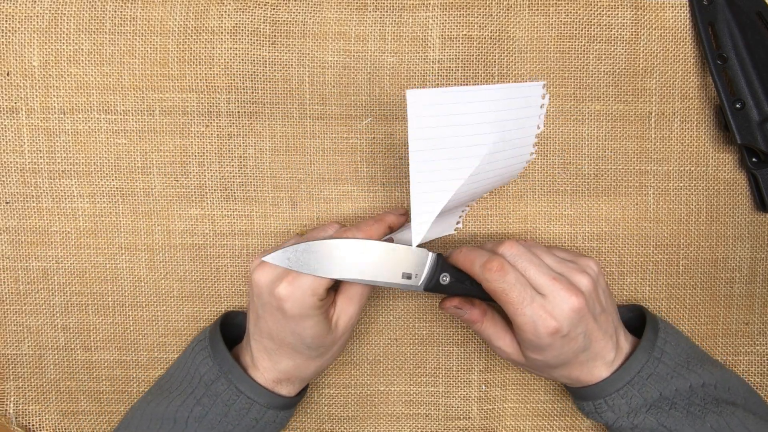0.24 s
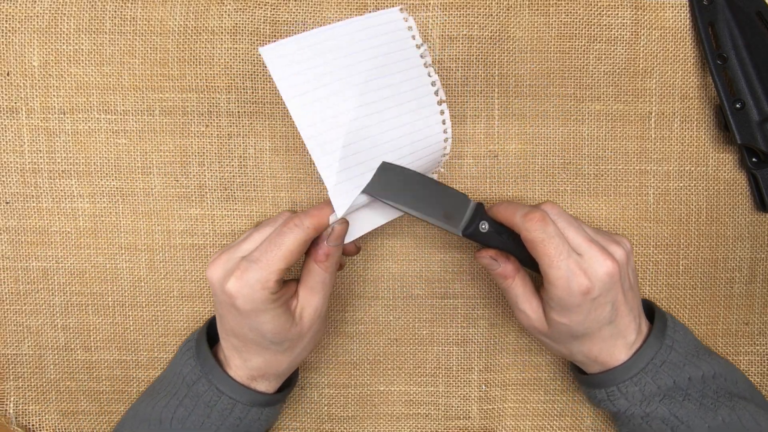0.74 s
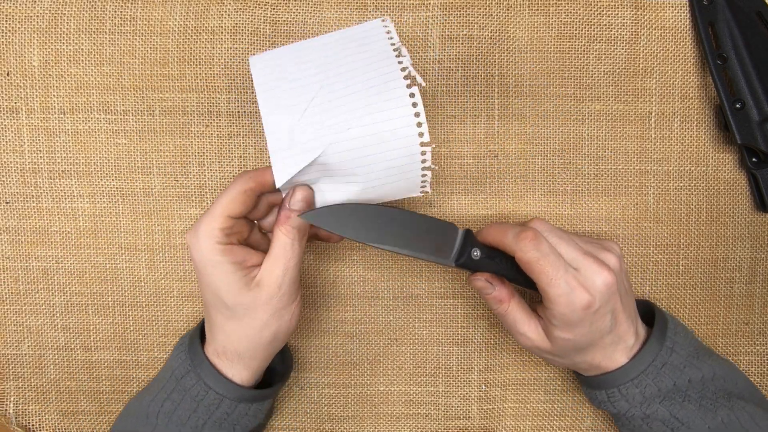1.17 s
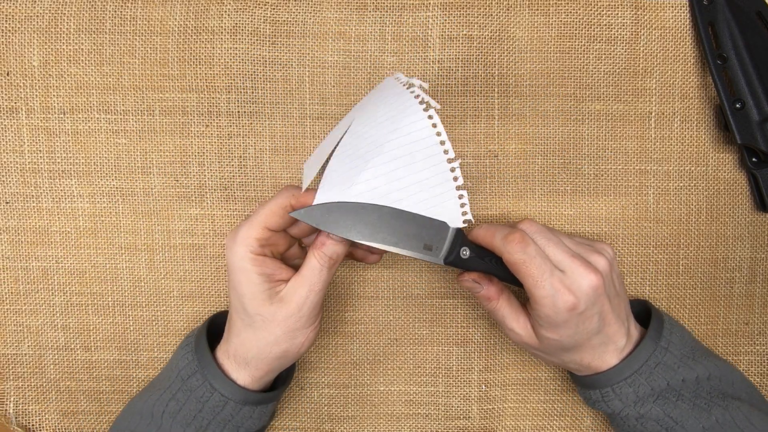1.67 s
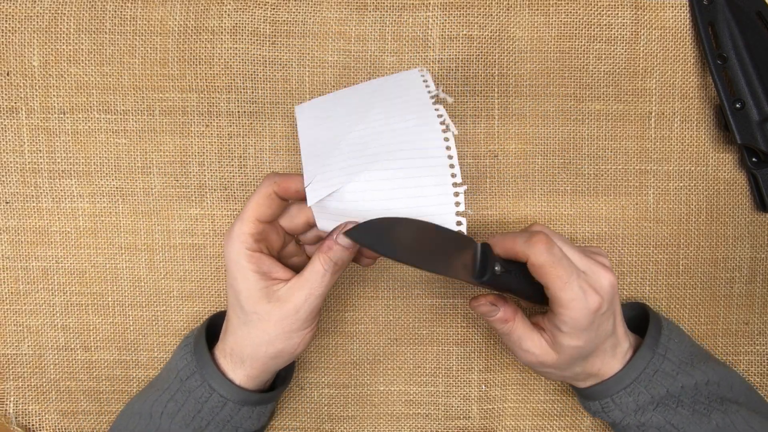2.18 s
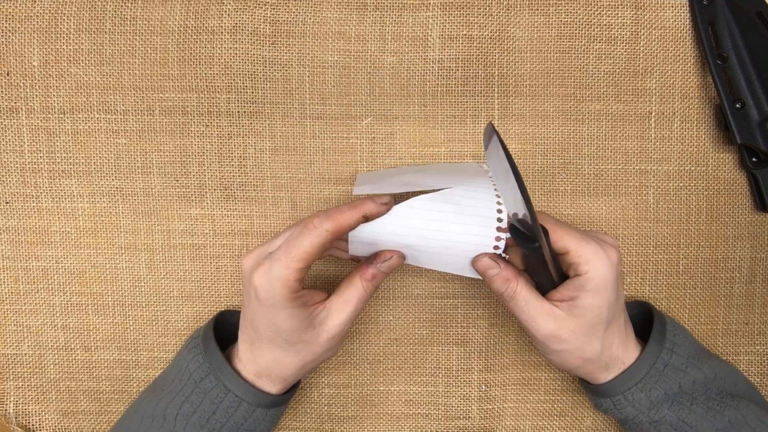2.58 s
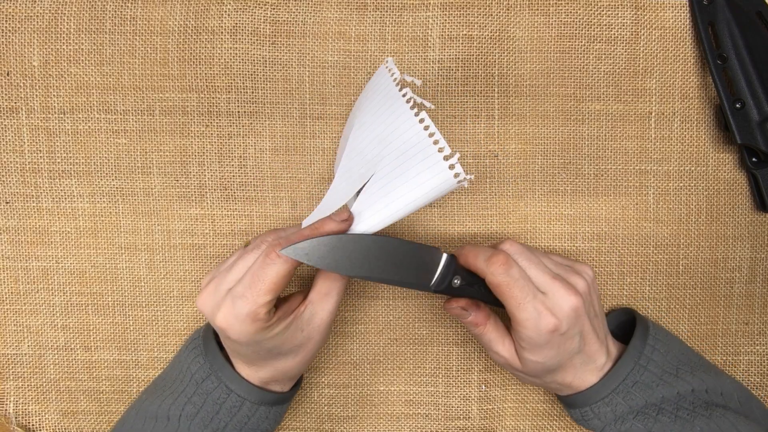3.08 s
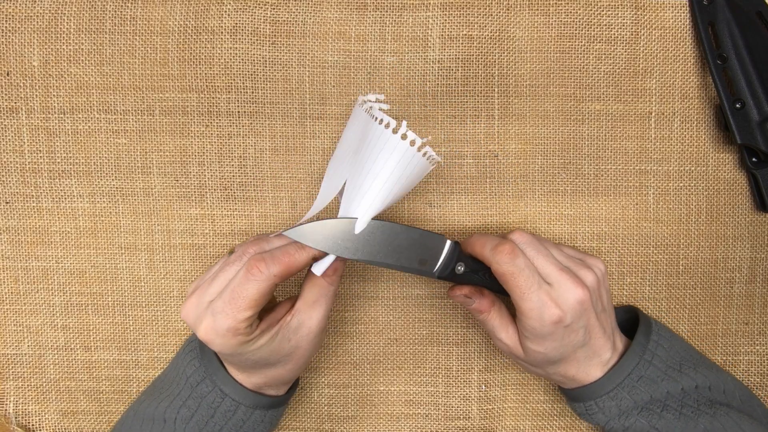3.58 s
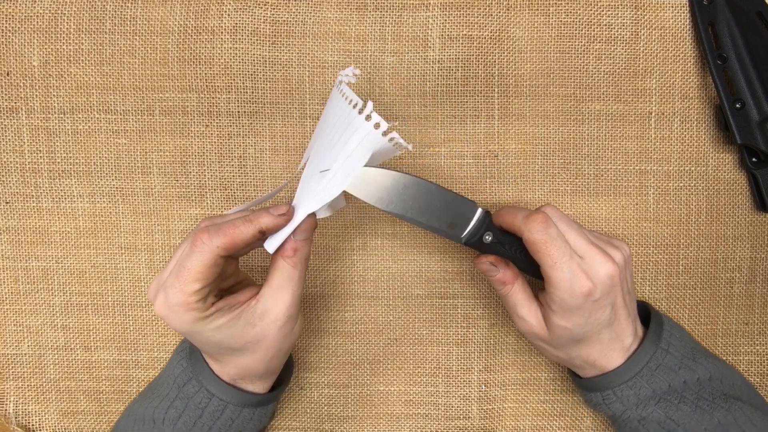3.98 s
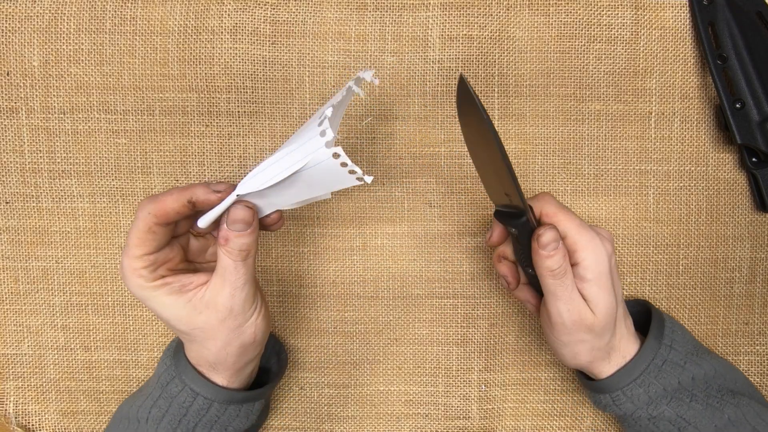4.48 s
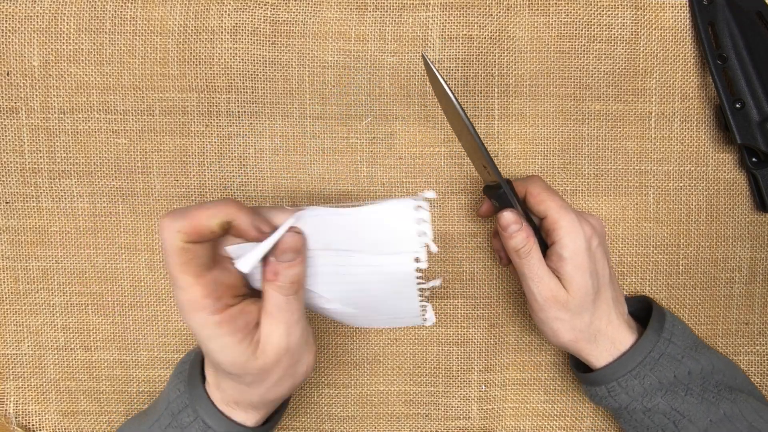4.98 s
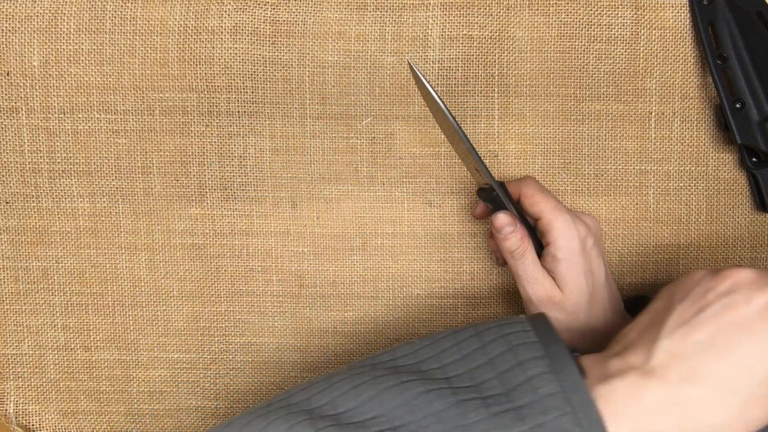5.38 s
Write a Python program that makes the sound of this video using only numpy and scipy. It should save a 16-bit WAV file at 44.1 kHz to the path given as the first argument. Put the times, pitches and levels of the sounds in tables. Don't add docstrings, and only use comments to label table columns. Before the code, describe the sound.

Two short papery rips of a sharp blade, the second harder, separated and followed by dry rustling and crackling of the handled sheet.

```python
import sys
import numpy as np
from scipy import signal
from scipy.fft import rfft, irfft, next_fast_len
from scipy.io import wavfile
from scipy.ndimage import uniform_filter1d, map_coordinates

SR = 44100
rng = np.random.default_rng(int(sys.argv[2]) if len(sys.argv) > 2 else 0)


def transcribe(u):
    v = np.clip(np.atleast_2d(u).T, -1, 1)
    q = np.round(v * 32767).astype(np.int16)
    wavfile.write(sys.argv[1], SR, q)


def volts_from_decibels(level):
    exponent = np.asarray(level, float) / 20
    return 10 ** exponent


N = 248708


def unit(x):
    return x / np.sqrt(np.mean(x ** 2) + 1e-20)


def along(points, hz):
    f, v = np.transpose(points)
    return np.interp(np.log(hz + 1), np.log(f + 1), v)


def gain_curve(rows):
    s, db, *rest = np.transpose(rows)
    t = np.arange(N) / SR
    gain = volts_from_decibels(np.interp(t, s, db, -150, -150))
    return gain, *(np.interp(t, s, column) for column in rest)


def wobble(rate):
    knots = rng.standard_normal(int(N * rate / SR) + 4)
    return map_coordinates(knots, [np.arange(N) * rate / SR])


def filtered(x, response):
    n = x.shape[-1]
    m = next_fast_len(n + 4096)
    return irfft(rfft(x, m) * response(np.fft.rfftfreq(m, 1 / SR)), m)[..., :n]


def registers(hz, edges_hz=(1700, 4600)):
    low, high = (1 / (1 + (hz / edge) ** 12) for edge in edges_hz)
    return np.sqrt([low, (1 - low) * high, 1 - high])[:, None]


def resonances(modes, ring_db):
    def response(f):
        return 1 + sum(volts_from_decibels(ring_db + db) * 1j * f * width / (centre ** 2 - f * f + 1j * f * width)
                       for centre, width, db in modes)
    return response


# (time [s], level [dB])
RUMBLE_SWELLS = [(0.0, -66), (0.16, -50.5), (0.31, -69), (0.63, -47.5), (0.74, -70), (0.8, -55),
                 (2.92, -57.5), (3.03, -47), (3.09, -60), (3.49, -45.5), (3.55, -61), (3.63, -52.5),
                 (3.8, -65), (3.91, -54), (4.46, -58.5), (5.01, -48.5), (5.04, -59.5), (5.64, -59.5)]
# (frequency [Hz], density [dB per Hz])
RUMBLE_COLOUR = [(8.8, -29), (15, -7), (49, -1.5), (113, -9), (146, -0.5), (262, -9.5), (320, -16),
                 (348, -17), (450, -32), (580, -44), (990, -120)]
# (frequency [Hz], width [Hz], level [dB])
ROOM_MODES = [(40.4, 29, -9), (63.1, 1.9, 8.5), (94.6, 3.4, 4), (143.2, 16, -4.5), (189, 20, -7.5),
              (225.7, 15, -6), (315.6, 11, 0)]
# (time [s], level over the hum [dB], width [s])
TABLE_BUMPS = [(.01, 7.5, 0.017), (.83, 4, 0.043), (1.62, 6, .04), (2.2, 1.5, 0.31), (2.47, 1.5, 0.038),
               (3.45, 1.5, 0.038), (4.96, 7, 0.072), (5.45, 3.5, 0.12), (5.62, 4, 0.11)]
# (frequency [Hz], density [dB per Hz])
HISS_COMMON = [(240, -55), (400, 0.5), (425, -5), (886, -3), (1050, -9.5), (1850, -10), (2840, -14),
               (6380, -5), (8530, -20.5), (15500, -25.5)]
HISS_DIFFERENCE = [(240, -66), (400, -17.5), (605, -19), (796, -12), (1200, -24), (2030, -26.5),
                   (2550, -35.5), (6990, -33), (13700, -52), (15500, -41)]


def background():
    def colour(f):
        return registers(f, (110, 2000)) * volts_from_decibels(along(RUMBLE_COLOUR, f)) * resonances(ROOM_MODES, 6)(f)

    noise = rng.standard_normal((2, N)) * volts_from_decibels(1.2 * wobble(11))
    deep, hum, _ = filtered(noise, colour)
    deep_gain, = gain_curve(RUMBLE_SWELLS)
    t = np.arange(N) / SR
    bumps_db = sum(db * np.exp(-((t - s) / width) ** 2) for s, db, width in TABLE_BUMPS)
    hum_db, hum_follows, hum_sway_db = -57.5, 0.17, 0.16
    hum_gain = volts_from_decibels(hum_db + bumps_db + hum_sway_db * wobble(2.9)) * unit(deep_gain) ** hum_follows
    mid = deep_gain * unit(deep[0]) + hum_gain * unit(hum[0])
    side = volts_from_decibels(-7.5) * deep_gain * unit(deep[1]) + hum_gain * unit(hum[1])

    hiss = filtered(rng.standard_normal((2, N)),
                    lambda f: volts_from_decibels([along(HISS_COMMON, f), along(HISS_DIFFERENCE, f)]))
    hiss_db = -68.5
    mid = mid + volts_from_decibels(hiss_db) * unit(hiss[0])
    side = side + volts_from_decibels(hiss_db + 7) * unit(hiss[1])
    return np.array([mid + side, mid - side]) * volts_from_decibels([[-0.7], [0.7]])


# (frequency [Hz], time to fall 60 dB [s])
ROOM_DECAY = [(400, 0.38), (3000, 0.28), (10000, 0.35)]


def room(pair):
    hz, t, z = signal.stft(rng.standard_normal((2, SR // 2)), SR, nperseg=256)
    decay = volts_from_decibels(-60 * t / along(ROOM_DECAY, hz)[:, None])
    tail = signal.istft(z * decay, SR, nperseg=256)[1]
    delayed = np.pad(pair, ((0, 0), (200, 0)))
    return signal.fftconvolve(delayed, tail / np.linalg.norm(tail[0]), axes=1)[:, :N]


# (frequency [Hz], likeness [0-1])
PORT_LIKENESS = [(100, .4), (500, .45), (1300, .6), (2300, .85), (2700, .68), (3600, .96), (4700, .95),
                 (5300, .5), (6300, .6), (7400, .2), (8300, .3), (10000, .2), (12000, .55), (15000, .55)]
# (frequency [Hz], phase [rad])
PORT_LEAD = [(300, .1), (1200, 1.3), (2200, .2), (4500, .05), (6500, -.55), (7600, .5), (8600, 2),
             (10000, 1.6), (11000, .05)]
# (frequency [Hz], level [dB])
PORT_BALANCE = [(100, -30), (700, -5), (1500, -1.5), (5500, 0), (8500, -3), (12000, -2)]


def ports(pair):
    def turn(f):
        return np.arccos(np.clip(along(PORT_LIKENESS, f), 0, 1)) / 2

    def summed(f):
        return np.sqrt((1 + np.cos(2 * turn(f)) * np.cos(along(PORT_LEAD, f))) / 2 + 0.075)

    def skew(f):
        return volts_from_decibels(along(PORT_BALANCE, f) / 2) * np.exp(-0.5j * along(PORT_LEAD, f))

    mid, side = filtered(pair, lambda f: np.array([np.cos(turn(f)), np.sin(turn(f))]) / summed(f))
    return filtered(np.array([mid + side, mid - side]), lambda f: np.array([skew(f), 1 / skew(f)]))


def patched(x, patchy_db, bins, frames):
    z = signal.stft(x, nperseg=512)[2]
    field = rng.standard_normal(z.shape[1:])
    field = uniform_filter1d(uniform_filter1d(field, bins, axis=0), frames, axis=1)
    return signal.istft(z * volts_from_decibels(patchy_db * unit(field)), nperseg=512)[1][:, :N]


def fibres(per_second, spread_db, clump_db):
    chance = rng.random(N)
    size = np.clip(rng.standard_normal(N), -2, 2)
    crackle = (chance < per_second / SR) * volts_from_decibels(spread_db * size + clump_db * wobble(60))
    t = np.arange(256) / SR
    smear = rng.standard_normal(len(t)) * volts_from_decibels(-60 * t / 0.0035)

    def phase(f):
        return np.exp(1j * np.angle(rfft(smear, 2 * len(f) - 1)))

    return filtered(crackle * rng.standard_normal((2, N)), phase)


def friction(levels, colour, modes, ring_db, crackle):
    parts = filtered(crackle, lambda f: registers(f) * volts_from_decibels(along(colour, f)) * resonances(modes, ring_db)(f))
    return sum(gain * unit(part) for gain, part in zip(levels, parts))


def strokes(rows, flap_db, rise_s, fade_db_per_s):
    flap_per_bright = 0.61
    t, power = np.arange(0, N + 32, 32) / SR, 0
    for s, hold, db, bright_db in rows:
        rise = np.clip((t - s) / rise_s, 0, 1)
        fade = volts_from_decibels(-fade_db_per_s * np.clip(t - s - rise_s - hold, 0, None))
        shares = volts_from_decibels(db + np.array([flap_db - flap_per_bright * bright_db, 0, bright_db]))
        power = power + (shares[:, None] * rise * fade) ** 2
    return [np.interp(np.arange(N) / SR, t, np.sqrt(p)) for p in power]


# (start [s], hold [s], level [dB], brightness [dB])
RUB_STROKES = [
    [(-.02, 0.0017, -49.5, -8), (.165, 0.019, -63.5, -8), (.97, 0.093, -56.5, 3), (1.04, 0.027, -53, 0),
     (1.14, 0.045, -55.5, -3.5), (1.21, 0.04, -61, -5), (1.49, 0.0087, -58.5, -7.5),
     (1.592, 0.094, -55.5, -8.5), (1.69, 0.14, -55, -1)],
    [(1.915, 0.11, -58, 3), (2.07, 0.04, -54, 1), (2.19, 0.15, -57, -0.5), (2.29, 0.06, -60, 10.5),
     (2.42, 0.051, -51.5, -1.5), (2.51, 0.095, -58.5, 1), (2.635, 0.025, -54.5, -7), (2.69, 0.14, -60.5, 6),
     (2.89, 0.046, -59, 4)],
    [(3.96, 0.071, -59.5, 4), (4.16, 0.037, -76.5, 8.5), (4.45, 0.084, -69.5, 8), (4.51, 0.21, -58.5, 3),
     (4.795, 0.057, -60, 2), (4.89, 0.18, -57, 6), (5.02, 0.029, -52.5, 4), (5.12, 0.063, -59.5, 2.5),
     (5.205, 0.098, -55.5, 5.5), (5.345, 0.016, -48, 2.5), (5.43, 0.09, -53, 1.5), (5.56, .08, -56, -1)],
]
# (frequency [Hz], density [dB per Hz])
GRIP_COLOURS = [
    [(240, -45), (400, -11), (466, -22), (821, -7), (1540, -12), (2430, -11), (4490, -12), (5910, 1.5),
     (8280, -7), (13500, -33), (15500, -24)],
    [(240, -37), (400, -21), (445, -21), (488, -21), (796, -3.5), (1490, -7), (2430, 3), (5150, -9.5),
     (6280, -2.5), (13300, -39.5), (15500, -36)],
    [(240, -41), (400, -18), (519, -21.5), (772, -15), (873, -12), (1710, -7.5), (3570, -6), (4920, -3),
     (6380, 6), (13700, -28.5), (15500, -24)],
]
# (frequency [Hz], width [Hz], level [dB])
RUBBED_MODES = [(792, 17, -5), (2480, 140, -6.5), (3100, 650, -7), (3700, 300, -16)]
GRIP_FLAP_DB = [-10.5, -6, -3.5]
GRIP_RISE_S = [.006, .0083, .02]
GRIP_FADE = [248, 156, 170]


def fingers():
    crackle = fibres(per_second=4000, spread_db=1.5, clump_db=1.33)
    sliding = patched(crackle, patchy_db=3.0, bins=5, frames=6)
    out = 0
    for colour, *grip in zip(GRIP_COLOURS, RUB_STROKES, GRIP_FLAP_DB, GRIP_RISE_S, GRIP_FADE):
        out = out + friction(strokes(*grip), colour, RUBBED_MODES, 10.2, sliding)
    return out


# (time [s], peak level [dB], ring [Hz], time to fall 60 dB [s], rise [ms])
SNAP_KNOCKS = [(1.5898, -41, 770, 0.035, 0.21), (1.591, -46.5, 260, 0.11, 1),
               (2.232, -48, 875, 0.039, 0.35), (2.312, -44.5, 650, 0.049, 0.92),
               (2.314, -48, 1320, 0.077, 1)]
SNAP_THUDS = [(2.0767, -50, 6460, .044, 1), (2.5259, -41, 2500, 0.04, 0.55),
              (2.6368, -39.5, 2580, 0.056, 0.46), (4.511, -43, 1830, 0.042, .4)]
SNAP_FOLDS = [(0.184, -51, 2200, 0.024, 0.65), (0.2636, -58, 3670, .03, 1),
              (1.209, -29.5, 2200, 0.021, 0.45), (1.423, -51, 3800, 0.028, 2),
              (1.4376, -41, 3840, 0.027, 0.38), (1.497, -50, 2400, 0.039, 1.5),
              (1.625, -36.5, 2300, .028, .3), (2.031, -37, 3480, 0.016, 0.24), (2.092, -42, 2380, .02, .5),
              (2.204, -53, 2420, .05, 1.5), (2.273, -36, 3460, 0.041, 0.76), (2.311, -25, 2500, 0.049, 2),
              (2.43, -42.5, 2400, .05, 1.8), (2.454, -32, 2480, 0.035, 0.89),
              (2.471, -40, 2500, 0.022, 0.75), (3.9616, -39.5, 3400, .05, 0.28),
              (4.0408, -36.5, 3100, .047, 0.6), (4.8105, -37, 3320, .05, 0.39),
              (4.8203, -33, 2670, 0.054, 1.8), (5.441, -43, 3730, 0.027, 0.9),
              (5.486, -39, 1750, 0.088, 3.3)]
SNAP_CRACKS = [(0.1686, -60, 5970, 0.04, .5), (0.9837, -29.5, 4150, 0.026, 0.27),
               (1.2088, -24.5, 3780, 0.016, 0.26), (1.655, -39.5, 2300, 0.11, 1),
               (1.7561, -33.5, 3600, 0.059, 0.31), (1.8105, -34, 6300, 0.059, .5),
               (2.366, -36.5, 6160, .03, 1.5), (2.3705, -32, 6160, .012, 0.22),
               (2.924, -30.5, 3820, .012, 0.24), (2.926, -46, 2500, 0.069, 1.1),
               (3.055, -48.5, 3810, 0.056, 0.55), (3.232, -44, 3190, 0.03, 0.42),
               (4.944, -29, 5950, 0.03, 2.9), (4.9955, -26, 3420, .04, 1.8), (5.354, -36, 3700, .1, 3),
               (5.362, -25, 3500, 0.035, 3.1)]
SNAP_TICKS = [(0.3474, -48, 5500, .025, .8), (1.025, -55, 5800, .037, .5), (1.923, -60, 2190, .057, 1),
              (2.083, -48.5, 6400, .03, 0.9), (2.4137, -42, 6300, .038, .4), (2.443, -52, 6200, .03, 1),
              (2.4555, -43, 6200, .02, .3), (2.9113, -46, 6400, 0.038, .3),
              (3.2698, -41, 3400, 0.044, 0.44), (4.016, -48, 6460, .033, .5),
              (4.2998, -52.5, 5800, .028, 0.34), (4.452, -70, 6250, 0.025, 0.44),
              (4.4834, -64, 6100, .037, .5), (4.5246, -46, 5840, .039, .5), (4.6717, -40, 5930, 0.038, 1),
              (4.892, -42, 6860, 0.033, 1.1), (4.9376, -33.5, 5900, 0.043, 0.53),
              (5.0389, -26.5, 6440, 0.0075, .25), (5.042, -41, 6500, 0.11, 1), (5.42, -45, 6060, .03, 1),
              (5.493, -33.5, 6360, 0.019, 1.3)]
# (flap level [dB], hiss level [dB])
SNAP_BALANCE = [
    (2, -5),
    (-5.5, -4.5),
    (-11.5, -11),
    (-21, -13),
    (-18.5, 5.5),
]
# (width [Hz], level [dB])
SNAP_PATCHES = [
    (150, 8.5),
    (400, 9),
    (338, 4.5),
    (496, 1.5),
    (500, 8),
]
# (frequency [Hz], density [dB per Hz])
BUCKLE_COLOUR = [(240, -13), (400, -20.5), (772, -7.5), (1490, -10), (2120, -5.5), (3510, -3.5),
                 (4920, -1.5), (6680, 9.5), (14100, -25.5), (15500, -53)]
# (frequency [Hz], width [Hz], level [dB])
WHOLE_SHEET = [(2200, 160, -7), (3670, 450, -8.5), (6400, 600, -8.5)]


def snaps():
    out = np.zeros((2, N + SR))
    t = np.arange(SR // 8) / SR
    kinds = (SNAP_KNOCKS, SNAP_THUDS, SNAP_FOLDS, SNAP_CRACKS, SNAP_TICKS)
    for rows, (flap_db, hiss_db), (width_hz, ring_db) in zip(kinds, SNAP_BALANCE, SNAP_PATCHES):
        for s, db, hz, t60, rise_ms in rows:
            envelope = (1 - np.exp(-1000 * t / rise_ms)) ** 2 * volts_from_decibels(-60 * t / t60)
            burst = rng.standard_normal((2, len(t))) * envelope
            ring = resonances([(hz, width_hz, 0), *WHOLE_SHEET], ring_db)
            parts = filtered(burst, lambda f: registers(f) * volts_from_decibels(along(BUCKLE_COLOUR, f)) * ring(f))
            flap, sheet, hiss = parts / np.abs(parts[:, 0]).max(axis=1)[:, None, None]
            snap = sheet + volts_from_decibels(flap_db + 2) * flap + volts_from_decibels(hiss_db - 5) * hiss
            start = round(s * SR)
            out[:, start:start + len(t)] += volts_from_decibels(db) * snap
    return out[:, :N]


# (time [s], pull level [dB], tautness [dB])
CUT_PULLS = [
    [(0.25, -89, 0), (0.264, -64, -5.5), (0.362, -50, 1), (0.462, -49.5, 0), (0.586, -41, 1),
     (0.776, -37, -0.5), (0.87, -37.5, -2.5), (0.96, -58, 2)],
    [(3.23, -61.5, 1.5), (3.356, -45, 0.5), (3.514, -41.5, 2), (3.544, -35, -0.5), (3.714, -32.5, 0.5),
     (3.854, -37, 0), (3.95, -67, 2)],
]
# (start [s], end [s])
CUT_TURNS = [
    (.5, 0.83),
    (3.47, 3.595),
]
# (frequency [Hz], density [dB per Hz])
BLADE_COLOURS = [
    [(240, -63), (400, -22.5), (614, -29), (809, -14), (914, -10.5), (1820, -9.5), (4770, -18),
     (6280, -3.5), (11100, -28), (15500, -28)],
    [(150, -61), (250, -38), (318, -18), (385, -34.5), (809, -18), (1890, -18.5), (2090, -3), (4470, -4.5),
     (6310, 2.5), (8320, -8), (13700, -28.5), (15500, -35)],
    [(240, -39), (400, -17.5), (821, -5.5), (1280, -15), (2030, -7.5), (2670, -5), (3360, -3.5),
     (4160, -12), (7790, -19.5), (15500, -49)],
    [(240, -42), (400, -23.5), (796, -1.5), (1240, -8.5), (2060, -10.5), (2630, -12), (3300, -7.5),
     (4030, -13.5), (6680, -7), (8670, -17), (13700, -29.5), (15500, -36)],
]
# (frequency [Hz], width [Hz], level [dB])
FLAP_MODES = [
    [(2500, 180, -5), (3660, 640, 1), (5360, 210, -2), (6370, 240, -14)],
    [(2020, 21, -18), (3410, 240, -12), (4150, 99, -27), (5350, 36, -14), (6300, 86, -16), (6610, 72, -8.5)],
    [(796, 92, -22), (2100, 190, 0), (3320, 300, -4.5), (6200, 470, -7)],
    [(2140, 190, -0.5), (3390, 500, -6.5), (4570, 86, -7), (4530, 90, -21), (6000, 250, -13),
     (7340, 75, -17)],
]
# (flap level [dB], fibre hiss level [dB])
BLADE_BALANCE = [
    (-11.5, 1.5),
    (-8, 0),
    (-7, -4.5),
    (-11, -3.5),
]


def blade():
    crackle = fibres(per_second=9000, spread_db=0.5, clump_db=0.48)
    tearing = patched(crackle, patchy_db=2.14, bins=2, frames=14)

    def phase_sound(i, taut_db):
        flap_db, hiss_db = BLADE_BALANCE[i]
        levels = volts_from_decibels(flap_db - taut_db), 1, volts_from_decibels(hiss_db + taut_db)
        return friction(levels, BLADE_COLOURS[i], FLAP_MODES[i], 8.2, tearing)

    out = 0
    for k, (rows, turn) in enumerate(zip(CUT_PULLS, CUT_TURNS)):
        gain, taut_db = gain_curve(rows)
        bite = phase_sound(2 * k, taut_db)
        pull = phase_sound(2 * k + 1, taut_db)
        pull_share = np.interp(np.arange(N) / SR, turn, [0, 1])
        out = out + gain * ((1 - pull_share) * bite + pull_share * pull)
    return out


def scene():
    clicks = snaps()
    paper = volts_from_decibels(-2.07) * (blade() + fingers())
    echo = volts_from_decibels(-7.5) * room(clicks) + volts_from_decibels(-7) * room(paper)
    return ports(paper + clicks + echo) + background()


def low_pass(x):
    return signal.sosfilt(signal.butter(12, 15400, fs=SR, output="sos"), x)


HOUSING_FREQUENCIES = [6800, 7900, 8040, 8140, 8260, 9500, 13000]
HOUSING_LEVELS = [-0.37, 1.5, -17, 2, -3, -2, -2]


def record(dry):
    def housing(f):
        return volts_from_decibels(np.interp(f, HOUSING_FREQUENCIES, HOUSING_LEVELS)) * (f < 15600)

    return low_pass(filtered(dry, housing))


dry = scene()
out = record(dry)
transcribe(out)
```